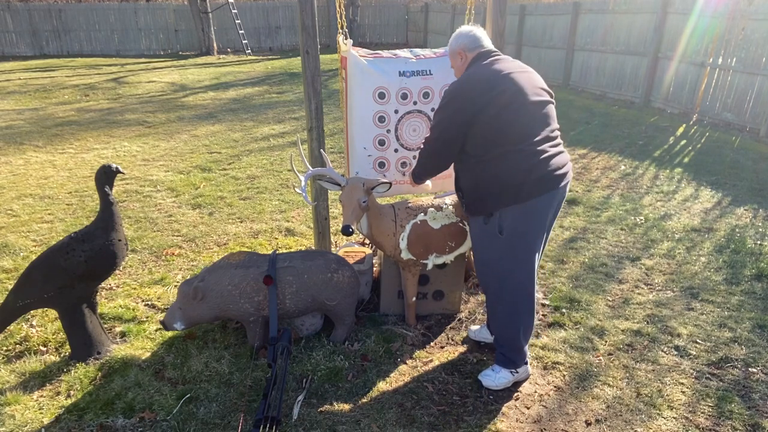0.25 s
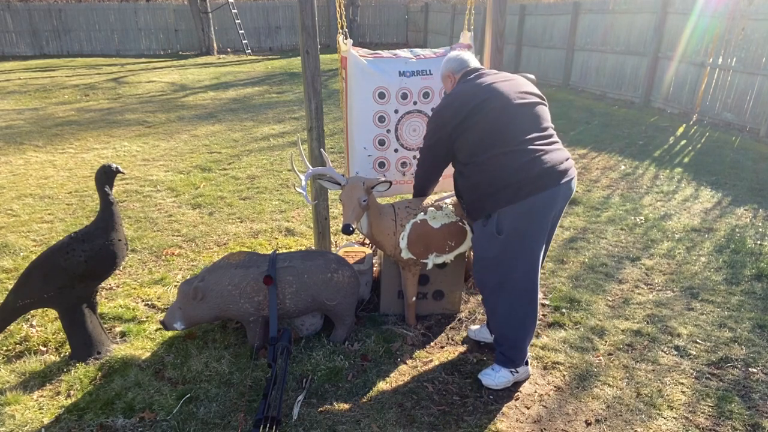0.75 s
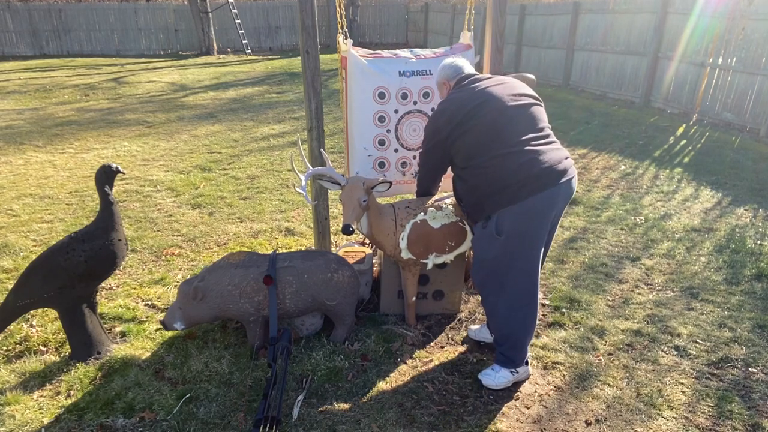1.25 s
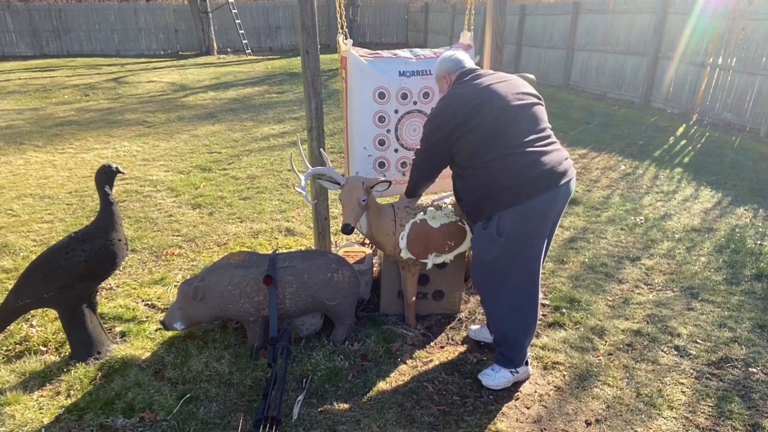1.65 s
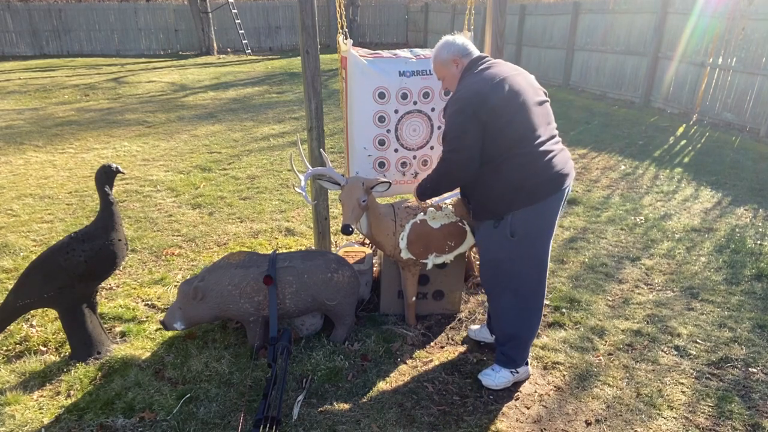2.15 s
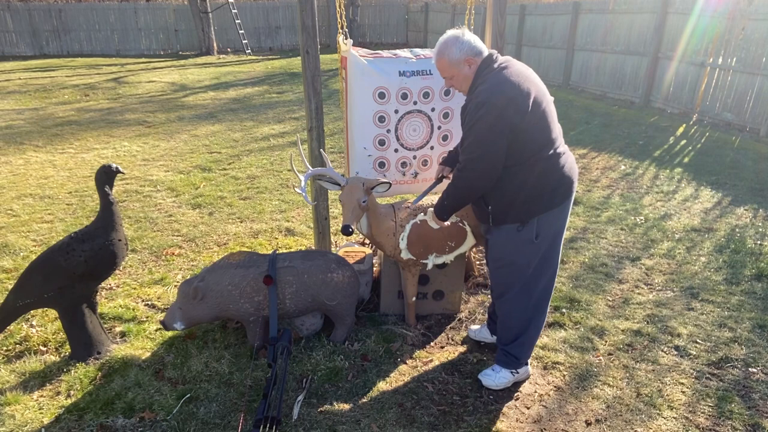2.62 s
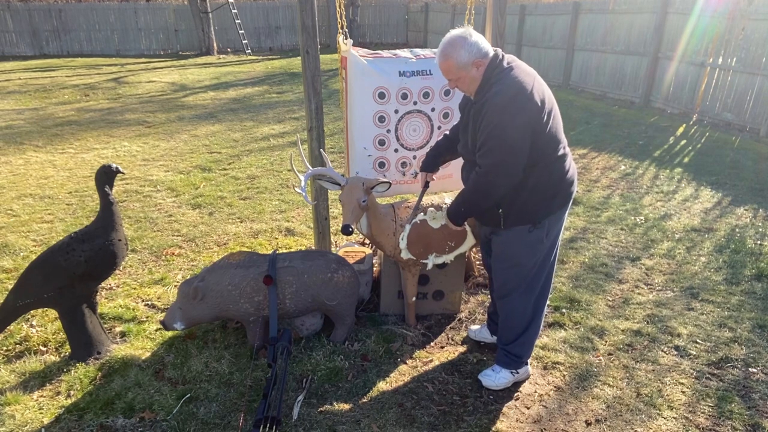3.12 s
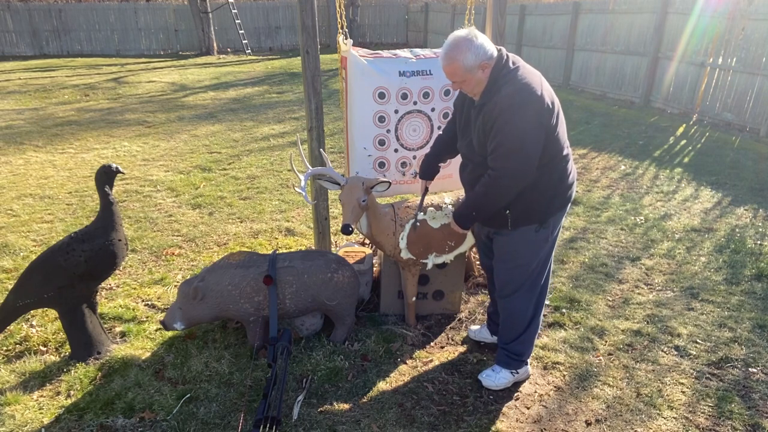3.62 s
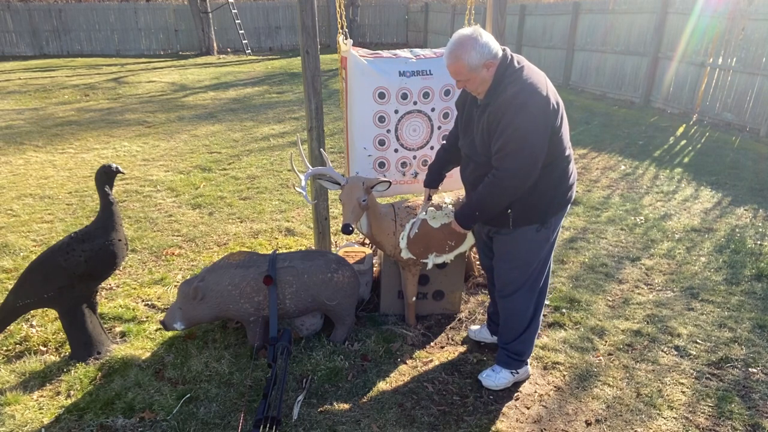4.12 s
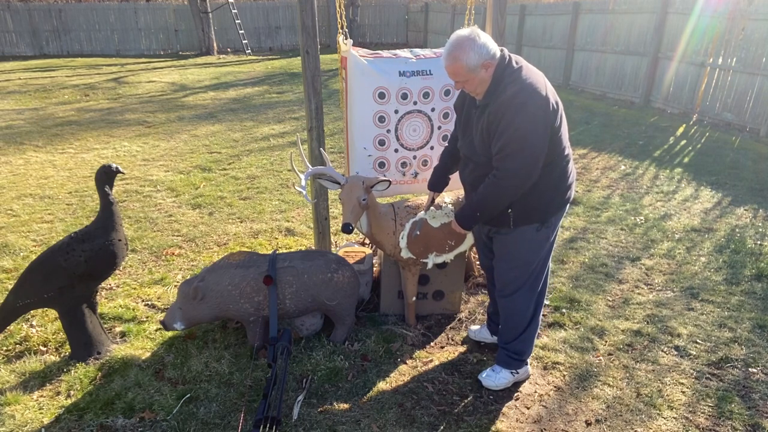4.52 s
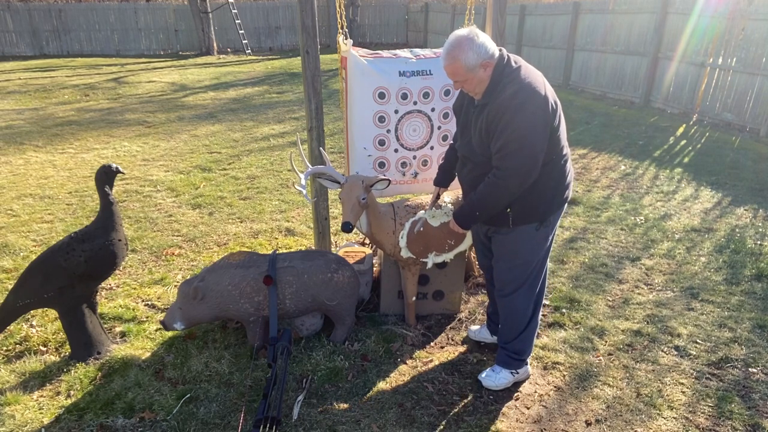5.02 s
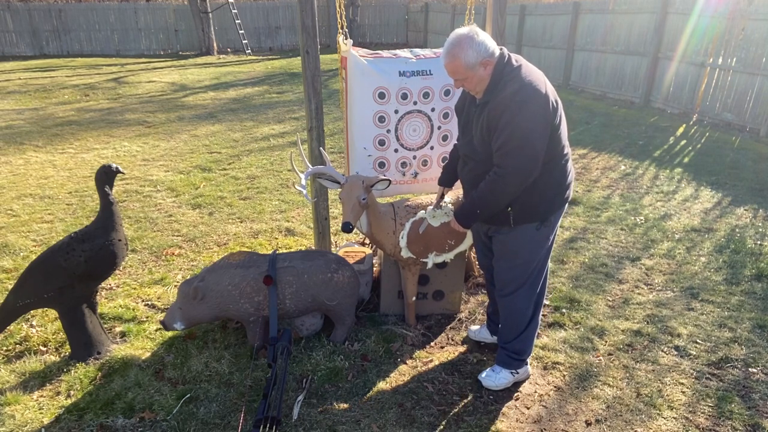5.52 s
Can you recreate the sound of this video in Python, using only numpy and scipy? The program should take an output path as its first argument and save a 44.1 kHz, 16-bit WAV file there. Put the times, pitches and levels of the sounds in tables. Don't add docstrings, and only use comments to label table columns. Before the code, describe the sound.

In an open yard, a songbird quickly repeats a gliding whistled phrase while other birds chirp over wind rumble, far traffic and a low engine drone. Faint rustles on dry foam come and go, then a hollow double knock. In the second half a serrated knife saws in quick raspy strokes with sharp snaps. Stereo microphone a few metres away.

```python
import sys
import numpy as np
from scipy import signal
from scipy.fft import rfft, irfft, next_fast_len
from scipy.io import wavfile
from scipy.ndimage import uniform_filter1d, map_coordinates

SR = 44100
rng = np.random.default_rng(int(sys.argv[2]) if len(sys.argv) > 2 else 0)


def unload_audio(sound):
    columns = np.transpose(np.atleast_2d(sound))
    steps = np.round(np.clip(columns, -1, 1) * 32767)
    wavfile.write(sys.argv[1], SR, steps.astype(np.int16))


def field_ratio(decibels):
    return 10 ** (np.asarray(decibels, dtype=float) / 20)


N = 254456


def unit(x):
    return x / np.sqrt(np.mean(x ** 2) + 1e-20)


def along(points, hz):
    f, v = np.transpose(points)
    return np.interp(np.log(hz + 1), np.log(f + 1), v)


def curves(rows):
    s, *cols = np.transpose(rows)
    return [np.interp(np.arange(N) / SR, s, c) for c in cols]


def wobble(rate):
    coarse = np.arange(0, N + 16, 16)
    knots = rng.standard_normal(int(N * rate / SR) + 4)
    slow = map_coordinates(knots, [coarse * rate / SR])
    return np.interp(np.arange(N), coarse, slow)


def filtered(x, response):
    m = next_fast_len(N + SR // 2)
    return irfft(rfft(x, m) * response(np.fft.rfftfreq(m, 1 / SR)), m)[..., :N]


def above(hz, edge_hz):
    return 1 / (1 + (edge_hz / (hz + 1)) ** 8)


def ports(x, lead):
    return filtered(x, lambda hz: np.exp(.5j * np.array([lead(hz), -lead(hz)])))


def smooth_field(shape, frames):
    field = uniform_filter1d(rng.standard_normal(shape), size=6, axis=0)
    return unit(uniform_filter1d(field, size=frames, axis=1))


def bursts(events, attack):
    out, t = np.zeros(N + SR), np.arange(SR // 5) / SR
    for s, db, t60, dull in events:
        envelope = field_ratio(db - 60 * t / max(t60, .002)) * (1 - np.exp(-t / attack))
        puff = rng.standard_normal(len(t)) * envelope
        pole = np.clip(dull, 0, .9)
        out[round(s * SR):][:len(t)] += signal.lfilter([1 - pole / 2], [1, -pole], puff)
    return out[:N]


# moment the teeth bite in seconds, length in seconds, tearing level in dB,
# place of top speed (0-1), rasp in dB relative to tearing.
STROKES = [(3.4833, .22, -60, .4, 3.5), (3.62, .37, -64, .62, 0.5), (3.99, .12, -69.5, .35, -4),
           (4.1, .165, -56, .47, -2), (4.315, .165, -54.5, .47, -1.5), (4.5113, .185, -54, .36, -4),
           (4.7354, .13, -58, .7, -1), (4.8935, .075, -68.5, .4, 1), (4.9464, .155, -52.5, .42, -0.5),
           (5.166, .165, -53, .5, 2.5), (5.35, .27, -60.5, .48, -0.5), (5.67, .115, -65, .5, -2)]


def strokes():
    lead_s, edge_s = .012, .24
    press = 1.05
    rest_db = -77.5
    gain, rasp = np.zeros(N + SR), np.zeros(N + SR)
    for s, length, db, top, rasp_db in STROKES:
        bend = np.log(.5) / np.log(np.clip(top, .15, .85))
        u = np.linspace(0, 1, int(length * SR)) ** bend
        speed = np.abs(np.sin(np.pi * u)) ** (edge_s / length)
        swell = field_ratio(db) * np.tanh(press * speed) / np.tanh(press)
        start = round((s - lead_s) * SR)
        gain[start:][:len(u)] += swell
        rasp[start:][:len(u)] += swell * field_ratio(rasp_db)
    in_foam = np.arange(N) > (STROKES[0][0] - .05) * SR
    return gain[:N] + field_ratio(rest_db) * in_foam, rasp[:N]


def cells(share, spread_db):
    burst = rng.random(N) < share
    size_db = spread_db * np.minimum(rng.exponential(size=N), 4)
    pops = unit(burst * rng.standard_normal(N) * field_ratio(size_db))
    return unit(pops + 0.72 * rng.standard_normal(N))


def patchy(x, depth_db):
    z = signal.stft(x, nperseg=256)[2]
    gain_db = depth_db * smooth_field(z.shape, frames=10) - .115 * depth_db ** 2
    return signal.istft(z * field_ratio(gain_db), nperseg=256)[1][:N]


# frequency in Hz, level in dB per Hz.
FOAM = [(500, -84), (1300, -16.5), (2000, -8), (2800, -4), (4200, -0.5), (5200, -0.5), (6600, 2.5),
        (7600, -2.5), (9000, 3), (12000, 4.5), (15500, -4)]


def foam_colour(hz):
    return field_ratio(along(FOAM, hz))


# start in seconds, peak in dB, dullness (0-1).
SNAPS = [(3.504, -44, 0.4), (3.5935, -43, 0.4), (4.1268, -46, 0.4), (4.3423, -41, 0.4), (4.492, -47, 0.6),
         (4.5465, -38, 0.1), (4.7648, -49, .4), (4.7786, -37, 0.4), (5.135, -53, .1), (4.9733, -29.5, 0.3),
         (5.0432, -35, 0.4), (5.1914, -42, 0.4), (5.2388, -30.5, 0.45), (5.394, -39, 0.4),
         (5.4072, -28, .9), (5.4273, -38, 0.4), (5.4613, -38, 0.45), (5.5166, -34.5, .9), (5.546, -42, 0.3),
         (5.5654, -38.5, 0.7), (5.6997, -44, 0.4)]


def knife():
    t, (gain, rasp_gain) = np.arange(N) / SR, strokes()
    fizz_db = 6.5 - 2.6 * (t - STROKES[0][0])
    clumps_db = 0.92 * wobble(25) + 1.5 * wobble(90) + 0.5 * wobble(400)
    small = unit(field_ratio(clumps_db) * cells(share=.25, spread_db=4.0))
    large_db = 0.81 * clumps_db + 1.87 * wobble(60)
    large = unit(field_ratio(large_db) * cells(share=.1, spread_db=5.0))

    def rasp_band(hz):
        return foam_colour(hz) * (1 - above(hz, edge_hz=4860))

    def tear_band(hz):
        return foam_colour(hz) * (above(hz, edge_hz=5360) - above(hz, edge_hz=9700))

    def fizz_band(hz):
        return foam_colour(hz) * above(hz, edge_hz=13600)

    def creak_band(hz):
        return above(hz, edge_hz=300) - above(hz, edge_hz=1100)

    rasp = unit(filtered(large + 0.77 * small, rasp_band))
    tear = unit(filtered(small, tear_band))
    fizz = unit(filtered(small, fizz_band))
    cut = gain * (field_ratio(1.2 * wobble(30)) * tear + field_ratio(fizz_db) * fizz) + rasp_gain * rasp

    loose = np.clip((t - 5.0) / .4, 0, 1)
    creak = field_ratio(2.5) * loose * gain * unit(filtered(large, creak_band))

    bites = [(s, db + 11, .4) for s, _, db, *_ in STROKES]
    catches = [(s, db + 0.5, .012, dull) for s, db, dull in SNAPS + bites]
    snaps = filtered(bursts(catches, attack=.0006), foam_colour)
    return field_ratio(1.0) * patchy(cut, depth_db=2.2) + creak + snaps


# start in seconds, peak in dB, dullness (0-1).
TOUCHES = [(0.5751, -69, 0.3), (0.634, -58.5, 0.66), (0.6644, -79, 0.4), (0.855, -57, 0.6),
           (0.9472, -71, 0.4), (1.051, -69, 0.3), (1.3314, -65, 0.33), (1.4431, -57, 0.6),
           (1.488, -60, 0.31), (1.6038, -74, 0.3), (2.888, -63, .9), (2.903, -62, 0.4), (2.9137, -61, 0.6),
           (2.9401, -75, 0.2), (3.1228, -66.5, 0.3), (3.1366, -63, 0.3), (3.238, -65, 0.2),
           (3.259, -56.5, 0.05), (3.2837, -57.5, 0.35), (3.3094, -70, 0.3)]


def rustles():
    grainy = field_ratio(3 * wobble(300))
    puffs = bursts([(s, db, .068, dull) for s, db, dull in TOUCHES], attack=.0008)
    return filtered(grainy * puffs, lambda hz: field_ratio(2) * foam_colour(hz) * (0.091 + above(hz, edge_hz=4700)))


# start in seconds, peak in dB.
KNOCKS = [
    (2.888, -33.5),
    (2.895, -51),
    (2.905, -38.5),
    (2.915, -54),
]
# frequency in Hz, level in dB, t60 in seconds.
BLOCK_MODES = [(298, -3, .025), (860, 0.5, 0.033), (960, -3, 0.055), (1270, -5.5, .015), (1526, -0.5, .028),
               (1850, -7, 0.018), (3450, -17, 0.03)]


def knocks():
    out, t = np.zeros(N + SR), np.arange(SR // 8) / SR
    for s, db in KNOCKS:
        crack = uniform_filter1d(rng.standard_normal(len(t)), size=5) * field_ratio(-60 * t / 0.013)
        ring = 0
        for hz, level, t60 in BLOCK_MODES:
            ring = ring + field_ratio(level + rng.normal(0, 1.7) - 60 * t / t60) * np.sin(2 * np.pi * hz * t)
        out[round(s * SR):][:len(t)] += field_ratio(db - 8.5) * (ring + 0.71 * crack)
    return out[:N]


# frequency in Hz, lead of the left port in radians.
FOAM_LEAD = [(2500, .3), (4000, .3), (5700, .95), (7000, .7), (7700, 0), (10150, -3.14), (12900, -6.28),
             (15500, -9.42)]


def in_front(x):
    return ports(x, lambda hz: along(FOAM_LEAD, hz))


def fence(x, count=30):
    out, hop = np.zeros((2, N + SR)), N // count
    fade = field_ratio(-60 * np.arange(1300) / SR / 0.051)
    near = rng.standard_normal((count, 2, 1300)) * fade
    window = np.sin(np.pi * np.arange(2 * hop) / (2 * hop))
    for k in range(count - 1):
        piece = x[k * hop:(k + 2) * hop] * window
        echo = signal.fftconvolve(piece[None], near[k] / np.linalg.norm(near[k, 0]), axes=1)
        out[:, k * hop:k * hop + echo.shape[1]] += echo
    return out[:, :N]


def foam_work():
    work = knife() + rustles() + knocks()
    dull = filtered(work, lambda hz: 1 - 0.57 * above(hz, edge_hz=8800))
    return in_front(work) + field_ratio(-4) * fence(dull)


def glide(notes, ease):
    return [(s, length, a, a + ease * (c - a), c, db) for s, length, a, c, db in notes]


def whistle(notes):
    out = np.zeros(N + SR)
    for s, length, first_hz, middle_hz, last_hz, db in notes:
        u = np.linspace(-1, 1, int(length * SR))
        curve_hz = (first_hz + last_hz) / 2 - middle_hz
        hz = middle_hz + (last_hz - first_hz) / 2 * u + curve_hz * u ** 2
        arch = field_ratio(db + 3) * (1 - u ** 2) ** 0.62
        out[round(s * SR):][:len(u)] += arch * np.sin(2 * np.pi * np.cumsum(hz) / SR)
    return out[:N]


# start in seconds, level in dB, head turn in dB per octave over 4 kHz,
# stretch of the timing.
PHRASES = [(.111, 0.5, -8, 1.025), (.44, 2.5, -1.5, 1.001), (0.771, 2.5, 0.3, 1.001),
           (1.1, 2.5, 0.3, 1.001), (1.437, -0.5, 3, 1.035)]
# seconds after its start, length in seconds, first Hz, last Hz, level in dB.
PHRASE = [(0, 0.019, 7600, 6450, -60.5), (0.033, .046, 4180, 4110, -49.5), (0.073, 0.022, 4120, 4080, -60),
          (.09, 0.028, 4100, 5100, -53), (0.115, 0.04, 5050, 5050, -64), (0.128, 0.027, 4050, 3480, -54),
          (0.19, .04, 3080, 3400, -55)]
CLOSING_NOTE = (0.24, 0.028, 3050, 2430, -50.5)


def song():
    notes = glide(PHRASE, ease=.75) + glide([CLOSING_NOTE], ease=.27)
    vary = rng.normal(size=(len(PHRASES), len(notes), 2))
    sung = []
    for (s, level, turn, stretch), row in zip(PHRASES, vary):
        for (ds, length, a, b, c, db), (v, w) in zip(notes, row):
            note_db = db + level + turn * np.log2(b / 4000) + 0.61 * v
            detune = 1 + .004 * w
            sung.append((s + ds * stretch, length, a * detune, b * detune, c, note_db))
    return whistle(sung)


# start in seconds, length in seconds, first Hz, last Hz, level in dB.
CHIRPS = [(.035, 0.018, 4200, 3920, -67.5), (.255, .008, 6800, 7600, -73), (.601, 0.072, 2950, 2620, -51),
          (.682, .028, 2580, 2500, -52), (1.018, .008, 6170, 7640, -69.5), (1.07, .03, 2630, 3000, -64),
          (1.338, .01, 9050, 8200, -70), (1.385, 0.0092, 7100, 8600, -55.5), (2.0, .05, 7250, 7450, -82),
          (2.02, 0.041, 6500, 7050, -79.5), (2.05, 0.11, 7250, 7020, -79), (2.088, 0.0093, 6300, 7400, -71),
          (2.1, 0.053, 7700, 7000, -80.5), (2.15, 0.097, 7150, 7220, -83), (2.176, .01, 7227, 8600, -71),
          (2.85, 0.015, 2860, 2700, -65), (3.262, 0.022, 6000, 7500, -69)]
# start in seconds, length in seconds, level in dB.
SEEPS = [(0, .1, -72), (.13, 0.052, -58.5), (.2, 0.07, -66), (.285, 0.06, -66), (.43, 0.045, -59),
         (.5, 0.08, -68)]
# start in seconds, level in dB, pitch factor.
ARCHES = [(2.576, -66, .93), (2.797, -62, .98), (3.031, -66, 1.01)]


def far_calls():
    seep_hz = 6150
    notes = [(s, length, seep_hz - 60, seep_hz, seep_hz - 60, db) for s, length, db in SEEPS]
    for s, db, k in ARCHES:
        notes.append((s, .036, 3400 * k, 3880 * k, 4430 * k, db - 4))
        notes.append((s + .009, .034, 4000 * k, 4580 * k, 3350 * k, db))
    return whistle(notes + glide(CHIRPS, ease=.52)) * field_ratio(2 * wobble(200))


# frequency in Hz, t60 in seconds.
YARD = [(1000, 1), (4000, 1), (6000, 0.85), (7000, .9), (8000, 0.33), (12000, 0.33)]


def yard(x):
    hz, t, z = signal.stft(rng.standard_normal((2, SR)), SR, nperseg=256)
    tail = signal.istft(z * field_ratio(-60 * t / along(YARD, hz)[:, None]), SR, nperseg=256)[1]
    return signal.fftconvolve(x[None], tail / np.linalg.norm(tail[0]), axes=1)[:, :N]


def birds():
    calls = (song() + far_calls()) * field_ratio(1.6 * wobble(120))
    wall = np.pad(calls, (round(0.033 * SR), 0))[:N]
    direct = ports(calls, lambda hz: -2 * np.pi * hz * 0.000287)
    returned = field_ratio(-20) * ports(wall, lambda hz: 2 * np.pi * hz * .0001)
    scattered = (calls + .4 * wall) * field_ratio(6 * wobble(500))
    sheltered = field_ratio(-6 * (np.arange(N) > 2.4 * SR))
    return direct + returned + field_ratio(-7.5) * yard(sheltered * scattered)


# time in seconds, firing rate in Hz, level in dB.
DRONE = [(0, 136.5, -41), (.25, 136.5, -37), (.6, 135, -42), (.85, 135, -37), (1.3, 133.6, -41),
         (1.45, 133.5, -38), (2.2, 131.5, -42), (2.7, 127.3, -42), (3.1, 127, -49), (3.42, 126.4, -44),
         (3.95, 125.5, -59), (4.3, 126, -53), (4.62, 127, -46), (5.5, 126.6, -51), (5.77, 127.5, -50)]
# multiple of half the firing rate, mean level in dB, share of the level swing.
ENGINE_ORDERS = [(1, -51, .4), (2, -45.3, 1.01), (3, -60, 1.1), (4, -74, 1.5)]
# frequency in Hz, level in dB.
HUMS = [(67.5, -52), (110, -52), (90.5, -55)]
# hum in Hz, time in seconds, half-width in seconds, rise in dB.
SWELLS = [(67.5, .45, .65, 9.5), (67.5, 3.1, .3, 8), (67.5, 4.1, .5, 8), (67.5, 5.4, .2, 7),
          (90.5, 4.64, .16, 15), (90.5, 5.0, .1, 9), (90.5, 5.45, .07, 11)]


def engine():
    t = np.arange(N) / SR
    firing_hz, db = curves(DRONE)
    swing_db = db - db.mean()
    lines = [(firing_hz * k / 2, mean_db + share * swing_db) for k, mean_db, share in ENGINE_ORDERS]
    for hz, level in HUMS:
        for hum, s, width, up_db in SWELLS:
            if abs(hum - hz) < 8:
                level = level + up_db * np.exp(-((t - s) / width) ** 2)
        lines.append((hz, level))
    tones = 0
    for hz, level in lines:
        phase = 2 * np.pi * np.cumsum(hz * (1 + 0.011 * wobble(9))) / SR
        tones = tones + field_ratio(level + 2 + 2.9 * wobble(15)) * np.sin(phase)
    return ports(tones, lambda hz: -2 * np.pi * hz * 0.00039) * field_ratio([[-.3], [.3]])


# frequency in Hz, side relative to mid in dB.
WIDTH = [(60, -16.5), (110, -13), (200, -6.5), (380, -2), (700, 3.5), (1290, 3), (2380, 0), (4400, -1.5),
         (8120, 5), (15000, -13)]


def rush(spectrum, patchy_db):
    z = signal.stft(rng.standard_normal((2, N)), nperseg=512)[2]
    gain = field_ratio(patchy_db * smooth_field(z.shape[1:], frames=14))
    pair = signal.istft(z * gain, nperseg=512)[1][:, :N]
    mid, side = filtered(pair, lambda hz: field_ratio(along(spectrum, hz) + [0 * hz, along(WIDTH, hz)]))
    return np.array([mid + side, mid - side]) / np.std(mid)


# time in seconds, level in dB.
BREEZE = [(0, 3), (.8, 2), (1.6, 0.1), (2.4, -.5), (3.1, .4), (4.0, .6), (4.7, .2), (5.3, -1.5), (5.77, -2)]
# frequency in Hz, level in dB per Hz.
RUMBLE = [(20, -32), (35, -5.5), (50, 4.5), (70, 8), (110, 6.5), (150, -11), (200, -31), (400, -52.5),
          (1200, -120)]
# frequency in Hz, level in dB per Hz.
TRAFFIC = [(90, -18), (150, -4.5), (250, -12.5), (500, -16), (1000, -19), (1500, -23), (2000, -27.5),
           (3200, -35), (5000, -44), (6500, -51.5), (8000, -64), (10000, -88)]
# frequency in Hz, level in dB per Hz.
GRASS = [(5000, -30), (7000, 2), (8500, -2), (11000, -1), (13500, -7), (15500, -8)]


def air():
    breeze_db, = curves(BREEZE)
    rumble_db = -43 + breeze_db - 3 + 0.61 * wobble(6)
    traffic_db = -55 + .45 * breeze_db + 4.0 + 0.71 * wobble(3.77)
    grass_db = -87 + 1.5 * wobble(5.2) + 1.1 * wobble(22)
    rumble = field_ratio(rumble_db) * rush(RUMBLE, patchy_db=1.14)
    traffic = field_ratio(traffic_db) * rush(TRAFFIC, patchy_db=1.15)
    grass = unit(filtered(rng.standard_normal(N), lambda hz: field_ratio(along(GRASS, hz))))
    return rumble + traffic + in_front(field_ratio(grass_db) * grass)


def scene():
    return foam_work() + birds() + engine() + air()


def low_pass(x):
    return signal.sosfilt(signal.butter(12, 15750, fs=SR, output="sos"), x)


def record(dry):
    return low_pass(dry)


dry = scene()
out = record(dry)
unload_audio(out)
```